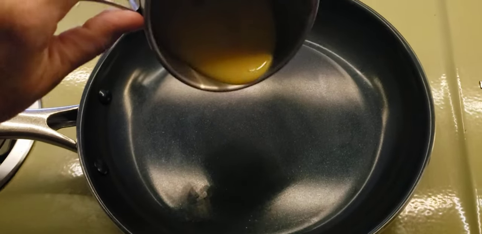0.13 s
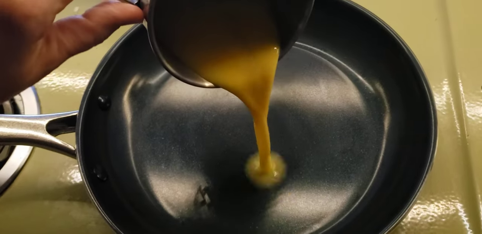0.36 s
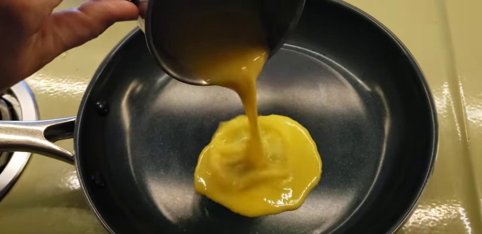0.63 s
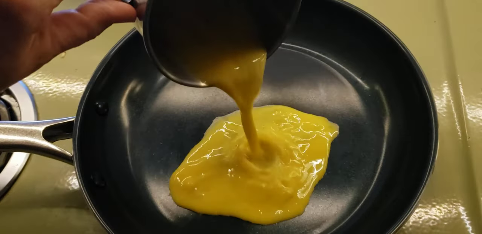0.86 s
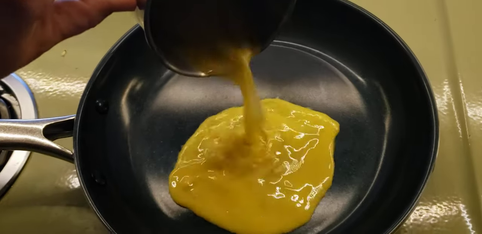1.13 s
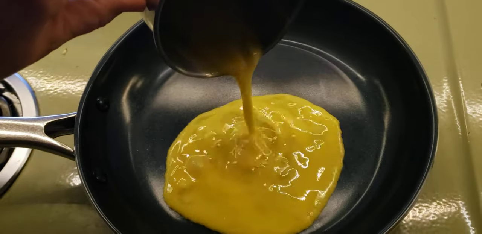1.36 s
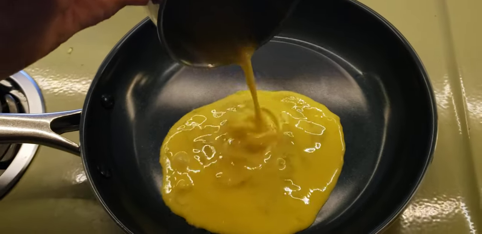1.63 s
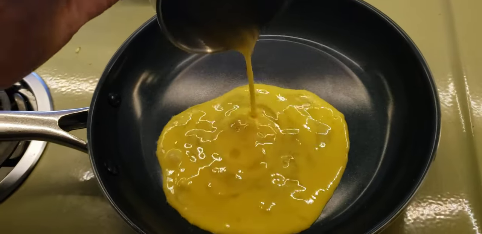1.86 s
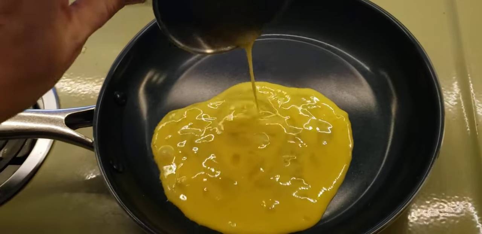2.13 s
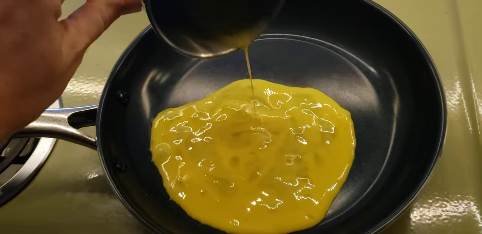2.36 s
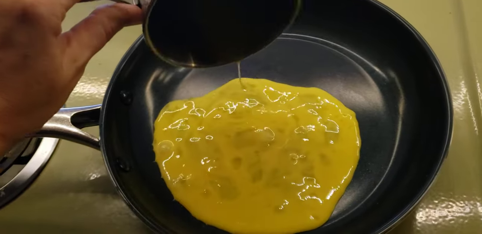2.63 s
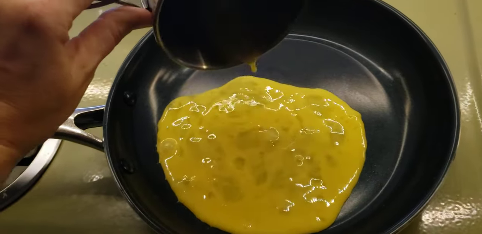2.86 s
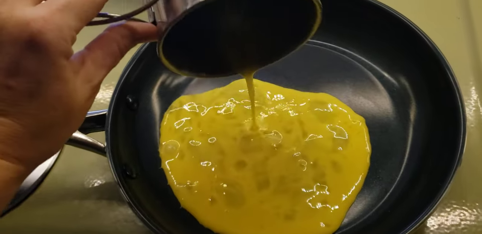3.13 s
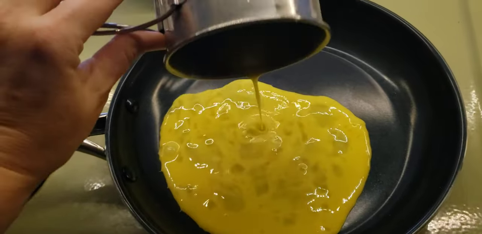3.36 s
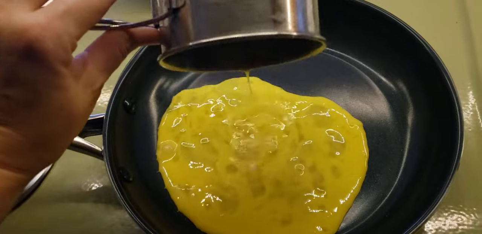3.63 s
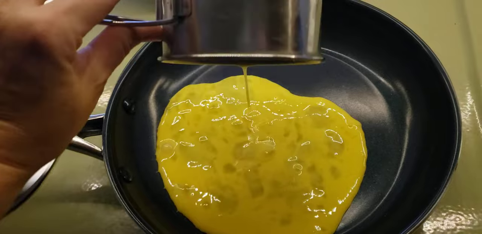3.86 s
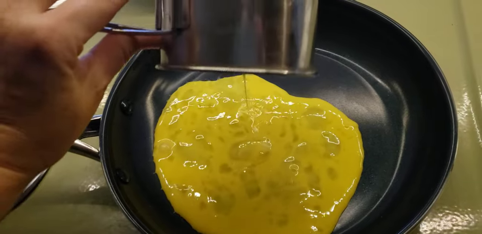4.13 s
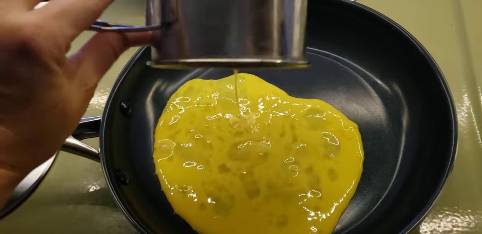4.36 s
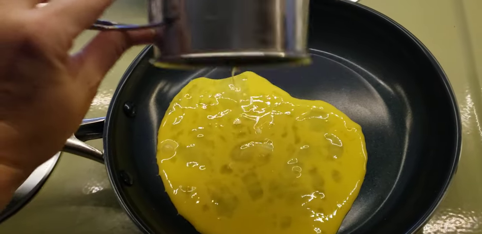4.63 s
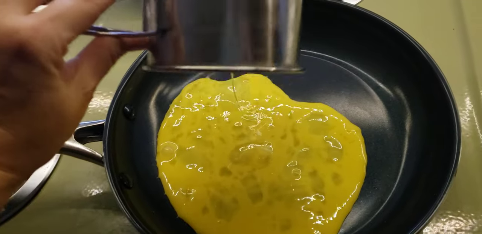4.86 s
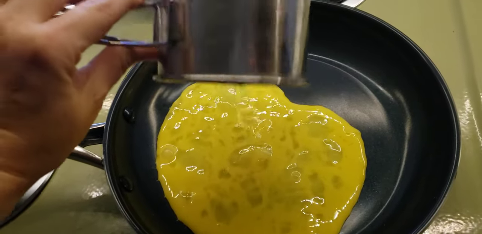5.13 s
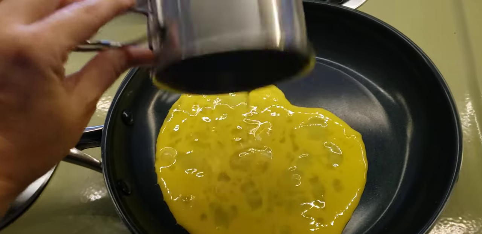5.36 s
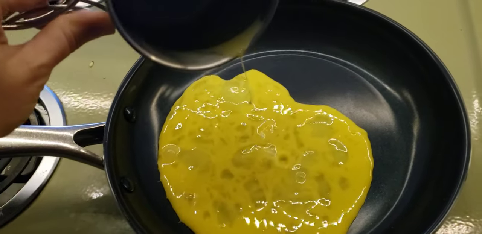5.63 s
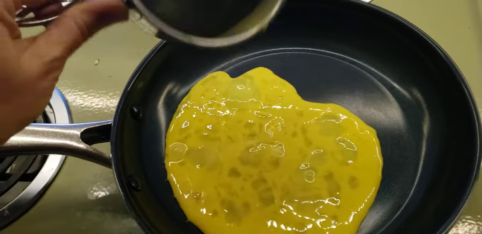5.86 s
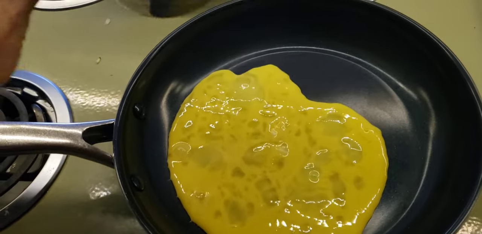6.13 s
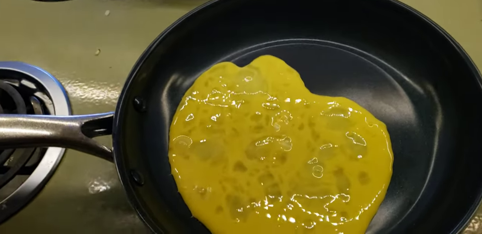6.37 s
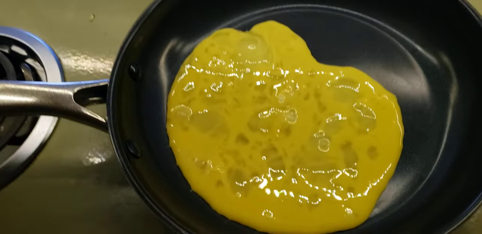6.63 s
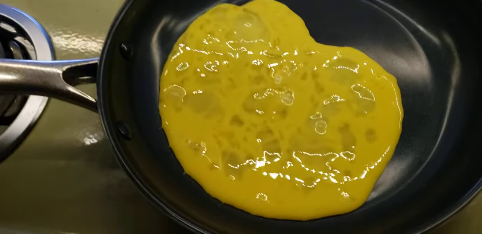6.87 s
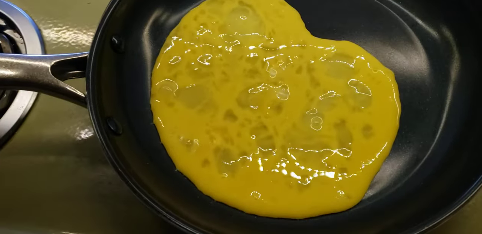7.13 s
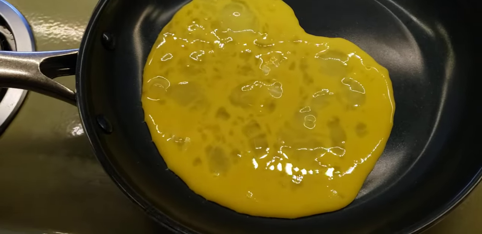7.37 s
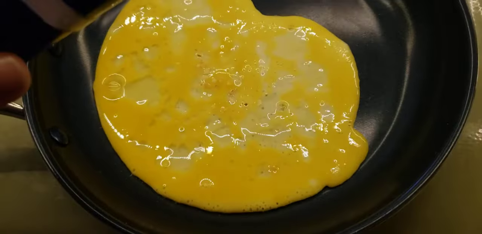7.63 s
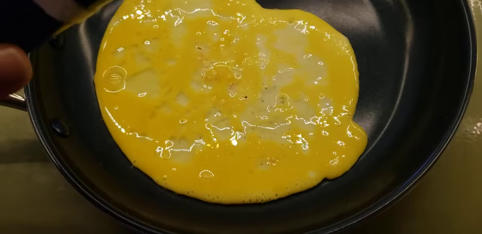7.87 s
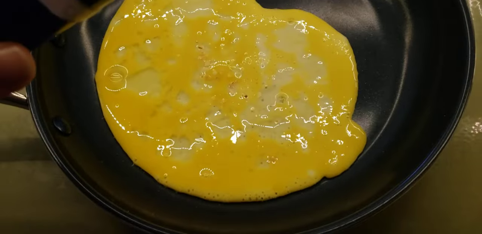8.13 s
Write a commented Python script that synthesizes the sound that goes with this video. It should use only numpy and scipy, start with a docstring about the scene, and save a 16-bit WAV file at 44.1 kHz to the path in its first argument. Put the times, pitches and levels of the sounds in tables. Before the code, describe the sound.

Near silence with faint metallic ticks, then beaten egg lands in a hot frying pan: a brief metallic ring and a loud, bright sizzle with watery burbling. It surges for about two seconds, then sinks into thinner fizz and scattered sharp crackles, ending in deeper, separate pops. Two dull soft knocks and faint handling rumble nearby. Close stereo microphone, quiet kitchen.

```python
"""Beaten egg is poured into a hot frying pan close to a two-port microphone in a quiet kitchen.
Water flashes to steam: noise gated by thousands of tiny bursts fizzes, spits and burbles, and clicks with
noise tails pop. The first splashes ring the pan as decaying sines, after a few ticks of hot metal.
Later the fizz thins into single, deeper crackles; two dull knocks, low sines with noise,
and a soft rumble of filtered noise sound nearby."""
import sys
import numpy as np
from scipy import signal
from scipy.fft import rfft, irfft, next_fast_len
from scipy.io import wavfile
from scipy.ndimage import uniform_filter1d, map_coordinates

SR = 44100
rng = np.random.default_rng(int(sys.argv[2]) if len(sys.argv) > 2 else 0)


def generate_wav(signal):
    """Clip the signal to [-1, 1] and save it as 16-bit WAV at the path in sys.argv[1]."""
    frames = np.transpose(np.atleast_2d(signal))
    scaled = np.clip(frames, -1, 1) * 32767
    pcm = np.round(scaled).astype(np.int16)
    wavfile.write(sys.argv[1], SR, pcm)


def rack_gain(trim_db):
    """Turn a fader trim in dB into the linear factor to multiply a signal by."""
    fader = np.asarray(trim_db, float)
    return 10 ** (fader / 20)


N = 363825
LEAD_S = .0001  # sound reaches the left port first


def unit(x):
    """Scaled to rms 1."""
    return x / np.sqrt(np.mean(x ** 2) + 1e-20)


def along(points, hz):
    """(Hz, value) points read on a log frequency axis."""
    f, v = np.transpose(points)
    return np.interp(np.log(hz + 1), np.log(f + 1), v)


def curves(rows):
    """One value per sample for each column after the time."""
    s, *cols = np.transpose(rows)
    return [np.interp(np.arange(N) / SR, s, c) for c in cols]


def peaks(rows):
    """Sum of pointed bumps (peak_s, height, rise_s, fall_s)."""
    t = np.arange(N) / SR
    return sum(np.interp(t, [s - abs(rise), s, s + abs(fall)], [0, height, 0])
               for s, height, rise, fall in rows)


def wobble(rate):
    """A smooth random curve, rate knots a second."""
    return map_coordinates(rng.standard_normal(int(N / SR * 200)), [np.arange(N) * rate / SR])


def filtered(x, response):
    """x times a response of frequency."""
    m = 2 * next_fast_len(N // 2 + 4096)
    return irfft(rfft(x, m) * response(np.fft.rfftfreq(m, 1 / SR)), m)[..., :N]


def causal(log_gain):
    """Minimum-phase response with this log gain: nothing sounds before a burst."""
    c = irfft(log_gain)
    fold = np.where(np.arange(len(c)) < len(c) // 2, 2., 0.)
    return np.exp(rfft(c * np.r_[1, fold[1:]]))


def pair(x, spectrum):
    """Two unrelated signals coloured and mixed as the ports hear them; unit noise gives a mean near rms 1."""
    # how alike the ports are once the delay is allowed for: pitch_hz, likeness (correlation)
    alike = [(60, 0.65), (120, 0.8), (240, 0.6), (480, 0.83), (950, 0.73), (1890, 0.49), (2700, 0.75),
             (3770, 0), (7520, 0.0036), (15000, 0.016)]

    def ports(hz):
        """Rows: left, right; columns: shared part, opposed part."""
        gain = causal(np.log(rack_gain(np.maximum(along(spectrum, hz), -80))))
        turn = np.arccos(np.clip(along(alike, hz), -1, 1)) / 2
        lead = np.exp(1j * np.pi * hz * LEAD_S)
        left = [np.cos(turn) * lead, np.sin(turn) * lead]
        right = [np.cos(turn) / lead, -np.sin(turn) / lead]
        return np.array([left, right]) * gain * np.sqrt(2 / np.mean(np.abs(gain) ** 2))
    return filtered(x, ports).sum(axis=1)


def blend(x, first, second, share):
    """The colour moves between two spectra."""
    return (1 - share) * pair(x, first) + share * pair(x, second)


def fade(power, t60):
    """Envelope of bursts that start at once and die away."""
    return np.sqrt(np.abs(signal.lfilter([1], [1, -rack_gain(-120 / (t60 * SR))], power)))


def egg():
    """Fizz, spit and burble share the same bursts, lulls and flares; single pops stand on top."""
    # the boil: time_s, vigour_db, small_db (small bubbles over the fizz), side_db (relative left-right place)
    boil = [(.43, -30.5, -0.5, 1.5), (.85, -31, -3, -1.5), (1.4, -26.5, -6.5, 1), (1.95, -31, -4.5, 1.3),
            (2.3, -34, -5.5, 2.2), (2.8, -36.5, -9.5, 2.3), (3.3, -35, -7.5, -1), (3.8, -36.5, -6.5, -1.5),
            (4.3, -39, -6.5, -3), (4.85, -36, -7.5, -0.7), (5.3, -39.5, -6, -3.5), (5.7, -40, -8.5, -4),
            (6.1, -38, -10.5, -3), (6.5, -37.5, -8.5, -0.5), (6.9, -37.5, -8.5, 0.5), (7.3, -44.5, -1, 1.1),
            (7.75, -43.5, -3.5, -1.1), (8.25, -44.5, -3.5, -0.3)]
    # character of the boil: time_s, then shares 0-1: power in sparse large bursts,
    # second fizz colour, large bubbles
    character = [(.4, 0.05, 0.4, 0.44), (1.6, 0.02, 0.13, .25), (2.5, 0.39, 0, 0.15), (4, 0.35, 0.15, 0.21),
                 (5, 0.7, 0.6, 0.13), (5.5, 0.64, .99, 0), (6.4, 0.71, .99, 0), (6.66, 0.64, 0.23, 0.91),
                 (8.25, 0.89, 0, 0.68)]
    # cool egg floods the hot metal and the boil sinks: deepest_s, depth_db, sinking_s, recovery_s
    lulls = [(.7, 6.5, 0.05, 0.092), (.885, 6.5, 0.043, 0.096), (.965, 23, 0.11, 0.045),
             (1.29, 4, 0.048, 0.079), (1.47, 6.5, 0.056, 0.034), (2.15, 3, 0.049, 0.11),
             (3.2, 3.5, 0.12, 0.25), (3.68, 7, 0.026, 0.013), (3.97, 7.5, 0.083, 0.11),
             (4.55, 4.5, 0.13, 0.075), (5.08, 4, 0.064, 0.022), (5.34, 7, 0.061, 0.032),
             (5.43, 8.5, 0.022, 0.12), (5.562, 3.5, 0.12, .008), (5.8, 5.5, 0.049, 0.21),
             (6.44, 9.5, 0.084, .1), (6.63, 12, 0.057, 0.017), (6.72, 5, 0.056, 0.013),
             (7.04, 2.5, 0.21, 0.043), (7.35, 1, 0.014, 0.048), (7.46, 2, 0.027, 0.14)]
    # trapped steam breaks out in a flare of bigger bubbles: peak_s, strength_db, rise_s, fall_s
    flares = [(0.441, 7, 0.022, 0.17), (.77, 12.5, 0.07, 0.035), (.82, 9, 0.027, .03),
              (1.03, 5.5, 0.088, 0.048), (1.17, 7, 0.057, 0.14), (1.33, 3.5, 0.035, 0.084),
              (1.92, 3.5, 0.053, 0.077), (2.11, 1, 0.054, 0.037), (2.28, 2.1, .06, 0.053),
              (2.74, 3.5, 0.027, 0.046), (3.05, 3.5, 0.068, 0.077), (3.46, 1.5, 0.056, 0.088),
              (3.66, 5.5, 0.077, 0.14), (3.83, 5.5, 0.017, 0.12), (4.18, 2.5, .04, 0.12),
              (4.74, 5, 0.033, 0.26), (5.19, 2.5, 0.1, 0.086), (5.38, 2.5, 0.023, .04),
              (5.572, 7, .008, 0.086), (5.67, 8.5, 0.075, .05), (5.94, 3.5, .02, .06),
              (6.13, 7, 0.055, .03), (6.65, 9.5, 0.0039, 0.079), (6.87, 5.5, 0.16, 0.039),
              (7.09, 8.5, 0.027, 0.13), (7.46, 8, .05, 0.063), (7.7, 5.5, 0.052, 0.13),
              (7.85, 3, 0.076, 0.038), (8.14, 5.5, 0.2, 0.042)]

    vigour_db, small_db, side_db = curves(boil)
    sparse_share, fizz_mix, deep = np.clip(curves(character), 0, 1)
    lull_db, flare_db = peaks(lulls), peaks(flares)
    surge_db = 0.88 * wobble(22)  # the boil comes in quick surges

    # each layer swings by its own share of a lull or flare
    fizz_db = vigour_db - lull_db + 0.16 * flare_db
    spit_db = vigour_db + small_db - 2.5 - 0.73 * lull_db + flare_db
    burble_db = vigour_db + small_db - 30.5 - 0.88 * lull_db + 0.97 * flare_db + 2.55 * wobble(16)
    # while egg still pours, the burble is 2.5 dB stronger; the stream ends at 2.8 s
    burble_db = burble_db + 2.5 / (1 + np.exp((np.arange(N) / SR - 2.8) / 0.055))

    # dense small bursts and sparse larger ones
    swarms = bursts(count=12000, spread_db=1.5), bursts(count=1100, spread_db=1.8)
    pop_s, crack_db, body_db = pop_list(fizz_db, sparse_share, deep)
    frying = fizz(fizz_db + surge_db, swarms, sparse_share, fizz_mix, pop_s, crack_db)
    frying = frying + spit(spit_db + surge_db, swarms, sparse_share, deep, pop_s, body_db)
    frying = frying + burble(burble_db + 0.71 * surge_db, swarms, sparse_share)
    side = 0.57 * side_db + 0.74 * wobble(31)  # where in the pan it boils
    return patchy(frying, depth_db=1.1) * rack_gain(np.array([side, -side]))


def fizz(level_db, swarms, sparse_share, fizz_mix, pop_s, crack_db):
    """The smallest bubbles: very short treble bursts, joined by the sharp cracks of the pops."""
    # two colours of the fizz, the second peaking near 12 kHz: pitch_hz, level_db (per Hz, relative)
    fizz_a, fizz_b = [(4710, -40), (8000, -8.5), (9170, -5), (12000, 3), (15100, 0.5), (15800, 0)], [(4710, -23), (8000, -6), (8570, -9.5), (10800, -2), (11600, 2),
                                    (12000, 7), (15100, -4), (15800, 1)]
    noise = sizzle(swarms, sparse_share, t60=.0045, own_db=1.0, hiss=0.74)
    noise = landing() * rack_gain(level_db + 0.29 * wobble(30)) * noise
    return blend(noise + pops(pop_s, crack_db - 1.5, t60=.006), fizz_a, fizz_b, fizz_mix)


def spit(level_db, swarms, sparse_share, deep, pop_s, body_db):
    """Bubbles in the middle range, deeper when large, joined by the bodies of the pops."""
    # colour of small and of large bubbles: pitch_hz, level_db (per Hz, relative)
    small, large = [(620, -65.5), (1050, -12.5), (1160, -7.5), (1870, -1), (2210, -1), (2560, -6.5),
                    (2970, -3.5), (3450, -5.5), (3900, -3), (4370, -3.5), (7260, -0.5), (8500, -5.5),
                    (11000, -14), (18700, -120)], [(440, -34), (750, -19.5), (1210, -1), (1760, -1), (1950, -0.5),
                                  (2200, -4), (3080, -0.5), (3890, -4.5), (4300, -2.5), (5170, -3.5),
                                  (5840, -3), (8500, -6), (11000, -89), (18700, -120)]
    noise = sizzle(swarms, sparse_share, t60=0.0073, own_db=1.1, hiss=0.89)
    noise = landing() * rack_gain(level_db + 0.2 * wobble(30)) * noise
    return blend(noise + pops(pop_s, body_db, t60=0.0076), small, large, deep)


def burble(level_db, swarms, sparse_share):
    """The low part of the boil: the same bursts with longer tails."""
    # colour of the burble: pitch_hz, level_db (per Hz, relative)
    colour = [(150, -39), (250, -17), (405, -4.5), (583, 2.5), (690, -3), (906, -4), (1000, -0.5),
              (1300, -16), (2200, -120)]
    noise = sizzle(swarms, sparse_share, t60=0.022, own_db=1.5, hiss=0.6)
    return pair(landing() * rack_gain(level_db) * noise, colour)


def landing():
    """Gain as the egg lands: first drops, then the stream."""
    return rack_gain(np.interp(np.arange(N) / SR, [.419, .42, .427, .436], [-90, -19, -7, 0]))


def bursts(count, spread_db):
    """Random instants and sizes of bursting bubbles; a few are far larger than most."""
    draw = rng.random((count, 2))
    return (draw[:, 0] * N).astype(int), -spread_db * np.log(1 - .995 * draw[:, 1])


def sizzle(swarms, sparse_share, t60, own_db, hiss):
    """Noise gated by dense and sparse bursts, each burst with its own strength in this band."""
    def envelope(at, db):
        own = own_db * rng.standard_normal(len(at))
        return unit(fade(np.bincount(at, rack_gain(2 * db + 2 * own), N), t60))
    dense, sparse = (envelope(at, db) for at, db in swarms)
    smooth = hiss * (1 - .55 * sparse_share)  # the smooth hiss thins as sparse bursts take over
    gate = unit(np.sqrt(smooth ** 2 + (1 - sparse_share) * dense ** 2 + sparse_share * sparse ** 2))
    return gate * rng.standard_normal((2, N))


def pop_list(fizz_db, sparse_share, deep):
    """Times, crack levels and body levels of the loudest pops and of 240 random lesser ones."""
    # the loudest single pops: time_s, peak_db, body_db (relative levels)
    loud_pops = [(0.9776, -26, -30), (1.0361, -23, -37), (1.4507, -12, -42), (1.4851, -17, -35),
                 (1.7, -13, -43), (1.8408, -20, -38), (1.9494, -14, -40), (2.0718, -19, -36),
                 (2.2445, -24, -40), (2.2655, -18.5, -35.5), (2.413, -24, -43), (2.431, -18.5, -34),
                 (2.5977, -23, -38), (2.665, -21, -44), (3.027, -22, -36), (3.2325, -27, -52),
                 (3.2656, -32, -52), (3.2666, -19, -40), (3.296, -18, -36), (3.4346, -22, -46),
                 (3.4507, -20, -41), (3.474, -17, -48), (3.6154, -22, -40), (3.7001, -22, -34),
                 (3.8373, -26, -44), (4.1082, -25, -40), (4.1506, -23, -48), (4.2548, -23, -45),
                 (4.3007, -29, -39), (4.3506, -21, -39), (4.506, -24, -53), (4.5636, -23, -43),
                 (4.5857, -22, -49), (4.603, -22, -45), (4.6209, -15.5, -35), (4.6549, -21, -39),
                 (4.6703, -16, -40), (4.8016, -32, -43), (4.8018, -18, -31.5), (4.843, -22, -36.5),
                 (4.8708, -26, -33), (4.8934, -18, -36), (4.9317, -15, -33.5), (5.24, -20, -39),
                 (5.3132, -21.5, -41), (5.353, -19, -38), (5.377, -13.5, -34.5), (5.4132, -22, -38),
                 (5.4634, -20, -53), (5.4827, -18, -52), (5.5284, -20, -58), (5.5443, -20.5, -58),
                 (5.5769, -18, -54), (5.5892, -12.5, -47), (5.6258, -12, -32.5), (5.6828, -26, -32.5),
                 (5.7173, -25, -40), (5.7745, -24, -33), (5.8243, -34, -42), (5.8893, -27, -54),
                 (5.931, -18, -49), (5.975, -23, -48), (6.0103, -36, -59), (6.0587, -22, -48),
                 (6.1096, -23, -48), (6.1258, -20, -47), (6.1488, -21, -38), (6.1717, -26, -37),
                 (6.2386, -27, -37), (6.2555, -32, -42), (6.324, -33, -40), (6.3508, -22, -40),
                 (6.3723, -19.5, -49), (6.4917, -40, -48), (6.4922, -21, -48), (6.5523, -21, -31),
                 (6.647, -27, -30.5), (6.7476, -14.5, -31.5), (6.819, -26, -32.5), (6.8345, -23, -43),
                 (6.8714, -23, -45), (6.9612, -26, -46), (6.987, -20, -38), (7.034, -25, -41),
                 (7.0616, -22, -44), (7.0748, -20, -37), (7.1016, -19, -34), (7.1236, -20, -32),
                 (7.3175, -22, -26.5), (7.359, -27, -33), (7.3877, -12.5, -25), (7.4213, -23, -32.5),
                 (7.4553, -21, -35), (7.47, -18, -33.5), (7.5214, -24, -55), (7.5677, -29, -42),
                 (7.6355, -25, -36), (7.6524, -20, -31), (7.6795, -23, -38), (7.6943, -17, -27.5),
                 (7.7883, -31, -40), (7.8173, -20, -44), (7.858, -18.5, -44), (7.957, -28, -43),
                 (7.9968, -23.5, -34.5), (8.065, -24, -38), (8.0987, -27, -36), (8.129, -29, -40),
                 (8.1954, -34, -54), (8.2228, -38, -49)]
    loud_s, peak_db, body_db = np.transpose(loud_pops)
    stray_s = 1 + (N / SR - 1.01) * rng.random(240) ** .7  # denser later on
    at = (stray_s * SR).astype(int)
    scatter_db = rng.standard_normal((240, 2))
    # lesser pops stand over the fizz, more so where sparse bursts prevail
    stray_db = fizz_db[at] + 3 + 9 * sparse_share[at] + scatter_db[:, 0]
    stray_body_db = stray_db - 14 + scatter_db[:, 1] + 6 * deep[at]
    return np.r_[loud_s, stray_s], np.r_[peak_db, stray_db], np.r_[body_db + 2.5, stray_body_db]


def pops(s, level_db, t60):
    """Single large bubbles: the skin tears with one click, then a burst of noise dies away."""
    power = np.bincount(np.round(s * SR).astype(int), rack_gain(2 * level_db), N)[:N]
    click = 1.6 * np.sqrt(power) * [[1], [.5]]  # shared part, opposed part
    return fade(power, t60) * rng.standard_normal((2, N)) + click


def patchy(x, depth_db):
    """The colour drifts as spots of the pan flare up and die down."""
    z = signal.stft(x, nperseg=256)[2]
    field = uniform_filter1d(rng.standard_normal(z.shape[1:]), size=5, axis=0)
    field = uniform_filter1d(field, size=60, axis=1)
    return signal.istft(z * rack_gain(depth_db * unit(field)), nperseg=256)[1][:, :N]


def echoes(x, t60, gap_s, shared):
    """The pan wall, stove top and splash-back return every burst as a short wash, partly alike at both ports."""
    t = np.arange(SR // 5) / SR
    wash = shared * rng.standard_normal(len(t)) + rng.standard_normal((2, len(t)))
    tail = (t > gap_s) * rack_gain(-60 * t / t60) * wash
    return signal.fftconvolve(x, tail / np.linalg.norm(tail[0]), axes=1)[:, :N]


def pan():
    """Each tick or splash rings the pan's modes at new strengths, with a soft swell at the onset."""
    # pan modes: pitch_hz, level_db (relative), t60_s (free ring time)
    modes = [(570, -22, .5), (1190, -13, .7), (1983, 7, .11), (2368, -4, .25), (3103, 1, .13),
             (3400, -2, .25), (3800, -3, .2), (4385, -1, .22), (4818, -7, .2), (5093, -6, .2)]
    # splashes that ring the pan: time_s, level_db, pitch factor of the ring,
    # tilt_db (per octave away from the second mode), share of the free ring time
    splashes = [(0.431, -23, 1, 1.5, .9), (0.70, -23, .96, -10, .2), (0.765, -31, 1, 0, .3),
                (0.80, -27, 1.09, 0, .3)]
    # hot metal creeps: time_s, level_db
    ticks = [(.055, -74), (.165, -78), (.285, -78), (.36, -77)]
    out, t = np.zeros(N + SR), np.arange(SR // 2) / SR

    def drift(hz):
        """Phase drift in cycles: the wet pan does not ring clean, least of all in its high modes."""
        return .035 * map_coordinates(rng.standard_normal(70), [t * 70]) * (hz / 1000) ** 2

    # ticks fall off by 14 dB per octave away from the third mode
    blows = [(s, db, 1, -14, .9, modes[2][0]) for s, db in ticks]
    blows += [(*row, modes[1][0]) for row in splashes]
    for s, db, pitch, tilt_db, life, best_hz in blows:
        ring = np.zeros(len(t))
        for hz, level, t60 in modes:
            mode_db = level + tilt_db * abs(np.log2(hz / best_hz)) + rng.normal(0, 1.4)
            cycles = pitch * hz * t + rng.random() + drift(hz)
            ring += rack_gain(mode_db - 60 * t / (life * t60)) * np.sin(2 * np.pi * cycles)
        out[round(s * SR):][:len(t)] += rack_gain(db) * (1 - np.exp(-t / .006)) * ring
    return np.array([out[:N], np.roll(out, round(LEAD_S * SR))[:N]])


def knocks():
    """Dull blows: a low ring of sinking pitch with longer noise around it."""
    # the knocks: time_s, level_db (relative), pitch_hz (at the start), t60_s (of the noise)
    blows = [(4.161, -52.5, 578, 0.75), (5.104, -45.5, 485, 0.42)]
    out, t = np.zeros((2, N + SR)), np.arange(SR // 2) / SR
    for s, db, hz, t60 in blows:
        band = signal.butter(1, [hz * 0.73, hz * 2.9], "bandpass", fs=SR)
        noise = unit(signal.lfilter(*band, rng.standard_normal((2, len(t)))))
        tone = rack_gain(2.0 - 60 * t / 0.24) * np.sin(2 * np.pi * hz * t * (1 - 1.18 * t))
        envelope = rack_gain(db - 60 * t / t60) * (1 - np.exp(-t / 0.0028))
        out[:, round(s * SR):round(s * SR) + len(t)] += envelope * (tone + 0.76 * noise)
    return out[:, :N]


def kitchen():
    """The quiet room tone, and a soft rumble when hands move: three layers of coloured noise."""
    # colour of the room tone: pitch_hz, level_db (per Hz, relative)
    room = [(13, -34), (22, -19), (48, -2.5), (129, 1), (240, -10.5), (557, -6), (1130, -20), (1740, -18),
            (2000, -22), (2170, -13.5), (8200, -30.5), (11700, -15.5), (14500, -19.5), (15800, -29.5)]
    # hands move: middle_s, length_s, rustle_db, bass_db (relative levels)
    handling = [(1.01, .2, -71, -93), (1.373, 0.47, -62.5, -84), (1.845, 0.51, -66, -80),
                (2.6, 0.68, -68.5, -84), (4.21, 0.14, -64, -81), (5.66, 0.58, -60, -82),
                (6.16, 1.6, -82, -74), (7.247, 0.46, -62, -74), (8.04, 1.2, -80, -72.5)]

    def moves(column):
        return peaks([(row[0], rack_gain(row[column]), row[1] / 2, row[1] / 2) for row in handling])

    def noise(spectrum):
        return pair(rng.standard_normal((2, N)), spectrum)

    # the first term in each bracket is hands at rest
    rustle = rack_gain(-9) * (rack_gain(-77.5) + moves(column=2)) * noise([(90, -36), (140, -2.5), (330, 5), (500, -43)])
    bass = rack_gain(-5.0) * (rack_gain(-85.5) + moves(column=3)) * noise([(25, -32), (45, -7), (110, -3), (160, -44)])
    return rack_gain(-77) * noise(room) + rustle + bass


def scene():
    """Everything at the microphone."""
    frying = egg()
    wash = rack_gain(-11) * echoes(frying, t60=0.11, gap_s=0.0012, shared=0.5)
    return frying + wash + pan() + knocks() + kitchen()


def roll_off(x):
    """The treble ends steeply here."""
    return signal.sosfilt(signal.butter(12, 16970, fs=SR, output="sos"), x)


def record(dry):
    """The ports differ in colour: the right one is deaf around 6 kHz; nothing passes above the band limit."""
    # colour of the two ports: pitch_hz, level_db (left over right)
    colour = [(60, 9), (92, -19), (140, 3), (210, -12), (330, -1), (500, -8.5), (770, 0), (1170, -4),
              (1790, -4.5), (2740, -2), (4190, 5.5), (6410, 21.5), (9810, -1), (15000, -2)]
    top_hz = 15850

    def ports(hz):
        left = 1 / (1 + rack_gain(-2 * along(colour, hz)))  # share of the power that the left port takes
        band_limit = np.clip((top_hz - hz) / 120 + .5, 0, 1) ** 2
        return np.sqrt(2 * np.array([left, 1 - left])) * band_limit
    mix = filtered(dry, ports)
    return roll_off(mix)


dry = scene()
out = record(dry)
generate_wav(out)
```